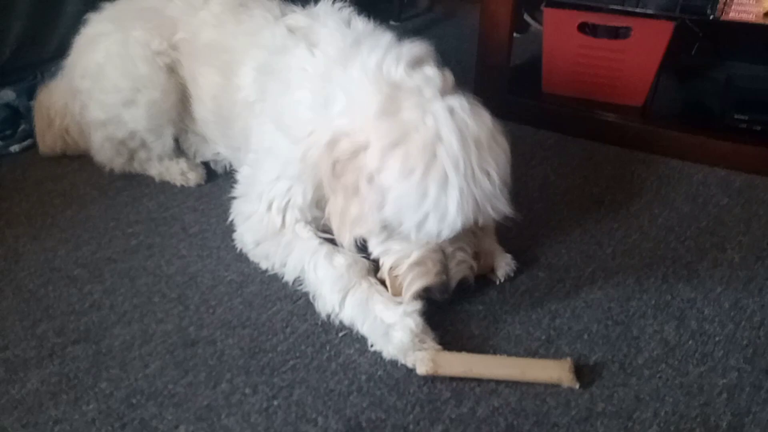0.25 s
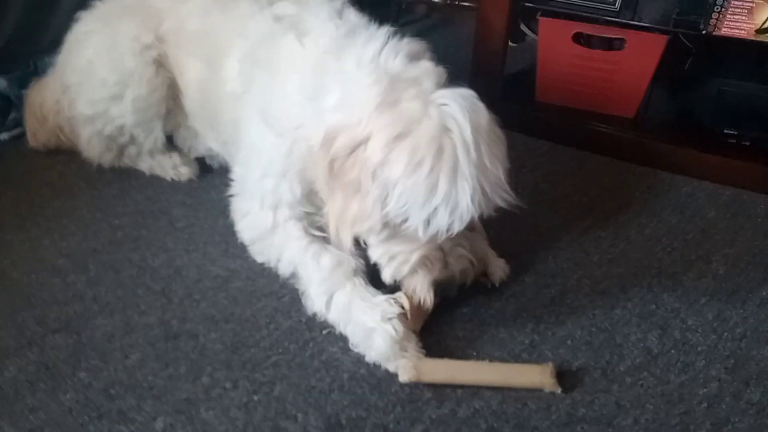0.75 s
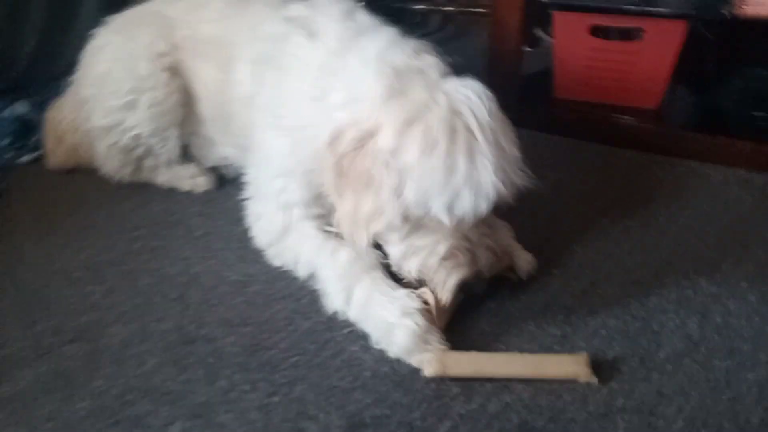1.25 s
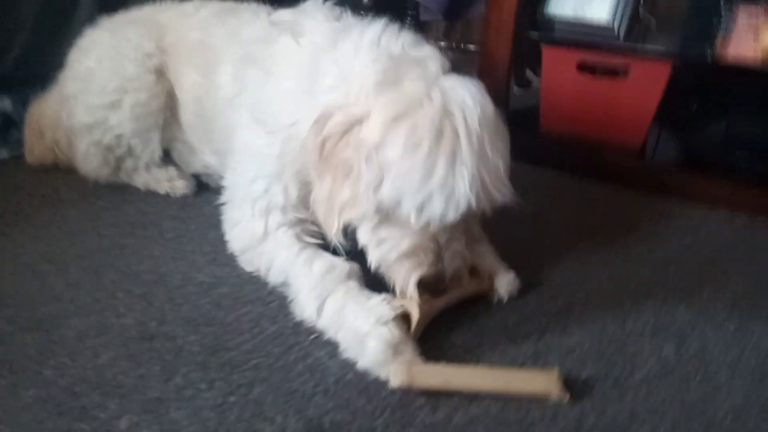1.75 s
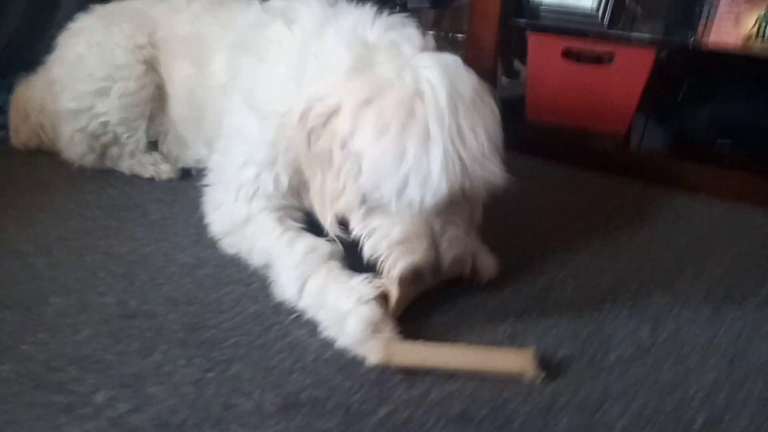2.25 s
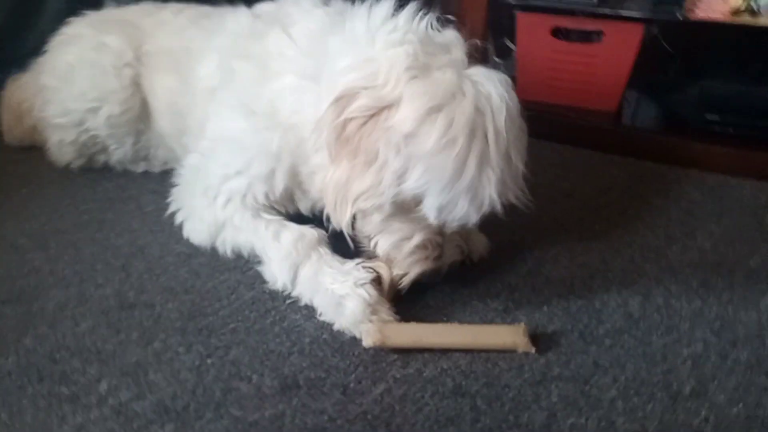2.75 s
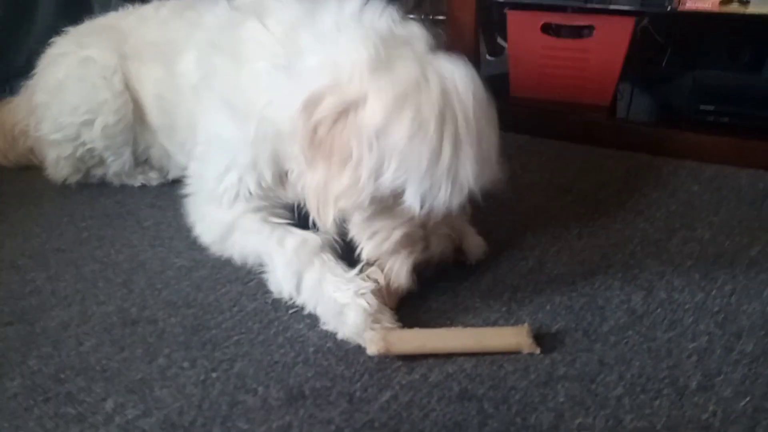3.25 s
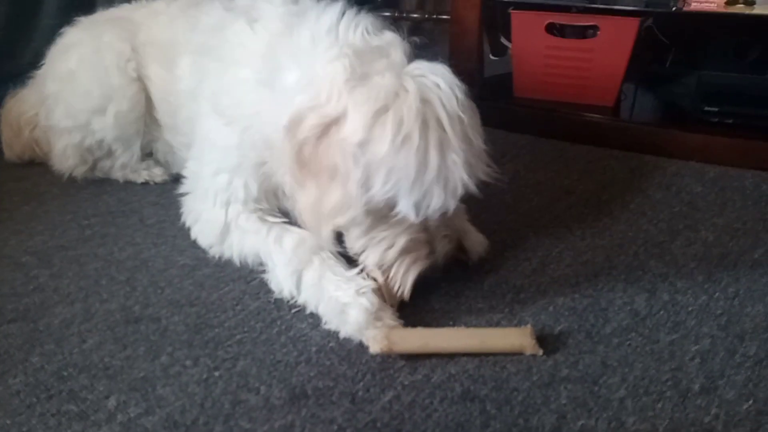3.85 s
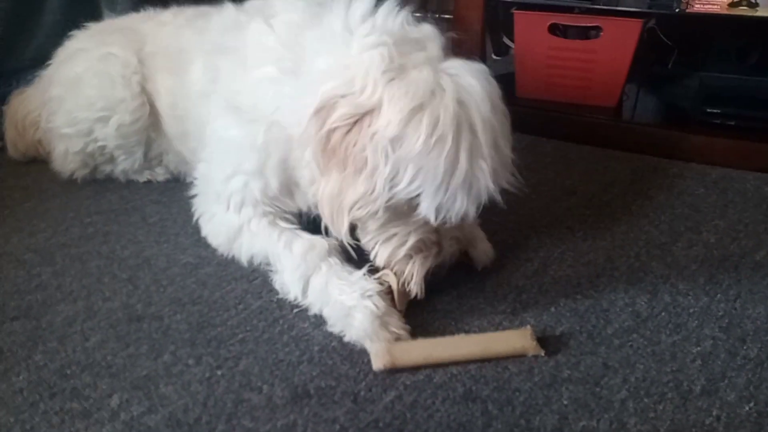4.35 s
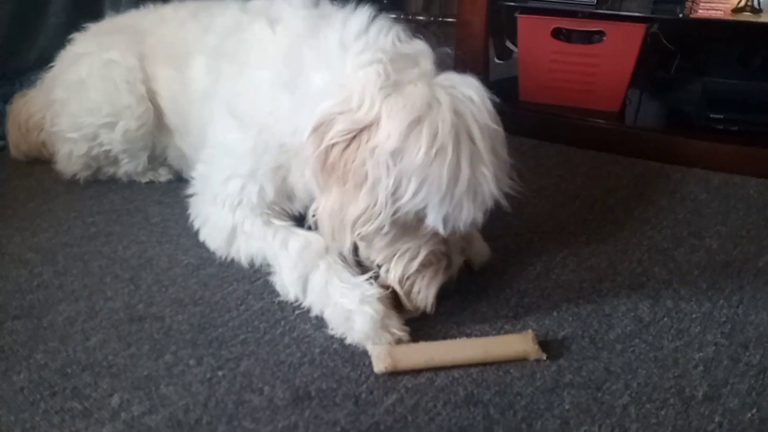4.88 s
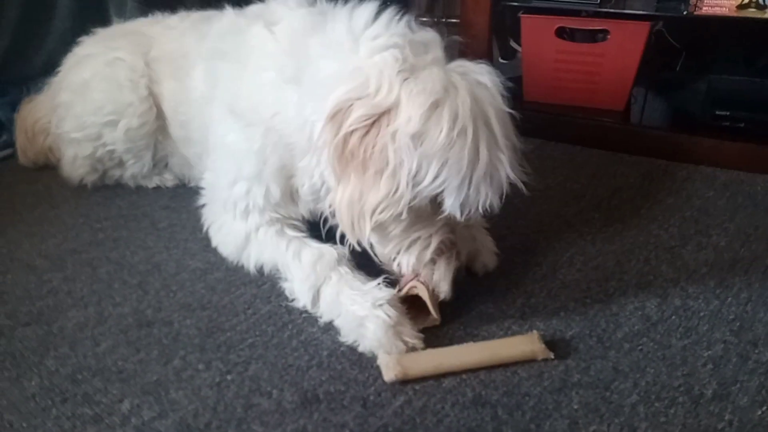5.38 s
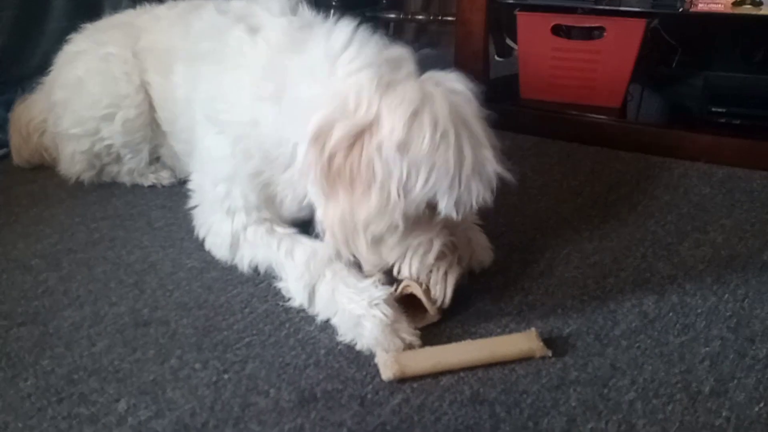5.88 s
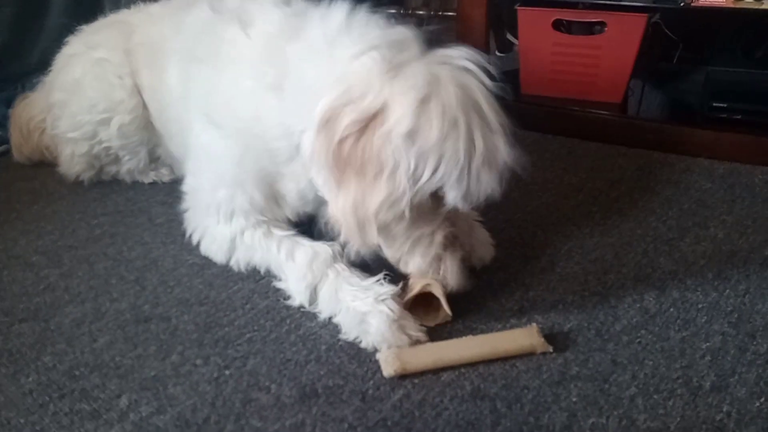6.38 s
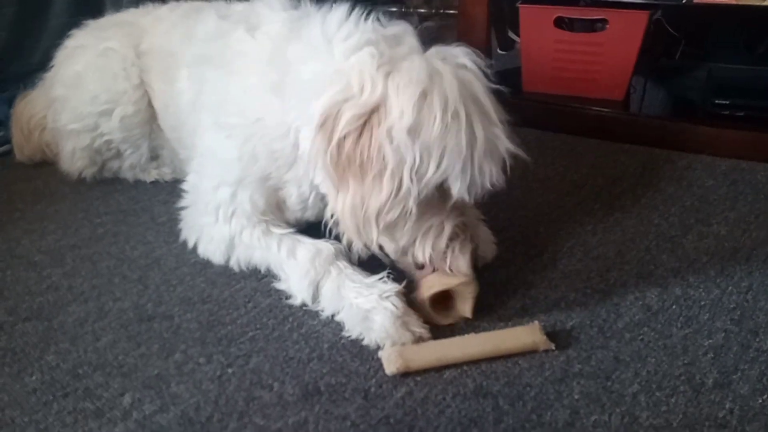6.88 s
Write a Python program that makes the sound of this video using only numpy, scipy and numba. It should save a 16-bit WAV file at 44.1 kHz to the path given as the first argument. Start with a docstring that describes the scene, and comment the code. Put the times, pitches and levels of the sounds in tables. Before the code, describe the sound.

A dog gnaws a hollow bone on carpet, close to a phone microphone in a quiet, damped living room with faint steady hiss. At about 0.3 s teeth scrape very softly, then a cluster of hollow, woody knocks and low floor thumps lands at 0.5-0.7 s. Small dull bumps follow. At 1.3-1.5 s comes a shorter, grating bite with a sharp splinter tick, then a wet smack and a light patchy rustle of fur and tongue fading by 2.2 s. It is nearly quiet until a faint scrape at 2.8 s and a rough crunch at 3.1-3.4 s. The hardest, brightest cracking runs from 3.9 to 4.3 s. A gritty, hollow drag follows at 4.9-5.3 s, and a last strong cluster of knocks and thumps at 5.9-6.4 s, with a tiny moist click. Then only hiss remains to about 7 s.

```python
"""A dog gnaws a hollow bone, close to a phone microphone, on a carpeted floor in a quiet room.
Teeth catch and drag as bursts of random clicks that ring the bone's air column, the jaw and the bone wall.
Shoves make the floor hum low and briefly, with a rough carpet rumble.
Behind that are splinter snaps and wet smacks as noise bursts, a patchy rustle of fur and tongue as dense
crackle, and a faint steady hiss of room tone and microphone noise."""
import sys
import numpy as np
from scipy import signal
from scipy.fft import rfft, irfft
from scipy.io import wavfile
from scipy.ndimage import uniform_filter1d
from numba import njit

SR = 44100
rng = np.random.default_rng(int(sys.argv[2]) if len(sys.argv) > 2 else 0)


def log_audio(samples):
    """Write samples as a 16-bit WAV file to the path given in sys.argv[1]."""
    # one column per channel
    frames = np.atleast_2d(samples).T
    # limit to full scale, then quantise
    limited = np.clip(frames, -1, 1)
    pcm = np.round(limited * 32767).astype(np.int16)
    wavfile.write(sys.argv[1], SR, pcm)


N = 314268
TIME = np.arange(N) / SR

# teeth catching on the bone: start_s, column_db (air column), wall_db (bone wall)
CATCHES = [(0.26, -47.5, -65), (0.383, -55, -69), (.506, -38, -89), (0.543, -37, -72), (.577, -49, -57),
           (.605, -22, -44), (0.642, -23.5, -44), (1.291, -38.5, -71), (1.41, -28.5, -52),
           (2.903, -38.5, -63.5), (3.075, -53, -64), (3.16, -37.5, -75), (3.207, -32.5, -44.5),
           (3.247, -28, -39.5), (3.278, -19, -38), (3.832, -51.5, -75), (3.888, -40, -86.5),
           (3.947, -36.5, -57.5), (3.978, -46.5, -54.5), (4.025, -20.5, -30), (4.048, -28, -49),
           (4.074, -27.5, -27), (4.086, -25.5, -34.5), (4.115, -30.5, -26.5), (4.17, -17, -24.5),
           (4.901, -31.5, -80.5), (4.924, -25, -45), (4.985, -29, -47), (5.152, -21.5, -40),
           (5.187, -40, -43.5), (5.849, -43, -84), (6.08, -16, -41.5), (6.12, -15.5, -26.5),
           (6.178, -35.5, -54), (6.239, -27, -45.5), (6.28, -20.5, -43), (6.309, -18.5, -35.5)]
# teeth dragging along the bone: start_s, length_s, column_db, wall_db
DRAGS = [(0.285, 0.024, -68, -71), (0.388, 0.065, -61, -88), (0.604, 0.1, -55, -61.5),
         (1.333, 0.088, -39.5, -49.5), (1.45, 0.077, -56, -49), (2.829, 0.088, -60.5, -71),
         (3.019, 0.049, -53, -78), (3.136, 0.087, -47.5, -97), (3.201, 0.14, -52, -62),
         (3.951, 0.069, -50, -64.5), (4.029, .19, -43.5, -49), (4.882, 0.23, -48.5, -57),
         (5.139, 0.062, -40.5, -45), (5.933, 0.12, -57, -65.5), (6.089, 0.1, -43, -53.5),
         (6.233, 0.12, -50, -49.5), (6.41, 0.02, -66, -71)]
# how the mouth holds the hollow bone: time_s, column_pitch_hz, wall_ring_db (freedom of the wall to ring)
BONE_HOLD = [(0.499, 702.3, -3.5), (1.403, 635, -4), (2.903, 772, 2), (3.2, 816.4, 2.5),
             (3.301, 604.5, -2.5), (4, 699.5, -1.5), (4.299, 700, -4), (4.9, 712.8, -4),
             (5.13, 715.3, -9.5), (5.189, 839.4, -8.5), (5.798, 700.4, 2), (6.151, 709.8, -6.5),
             (6.251, 700, -6.5), (6.38, 634, -3.5), (6.42, 817, -6)]
# resonances of the bone wall, low to high: centre_hz, width_hz, relative_level_db
WALL_MODES = [(947, 177, 4.5), (1356, 340, -0.5), (1902, 116, 2), (2300, 950, -7.5), (3317, 170, 4.5),
              (3995, 780, -6.5), (5060, 290, -13), (6760, 700, -35), (12530, 11000, -23.5)]
# resonances of the jaw: centre_hz, width_hz, relative_level_db
JAW_MODES = [(175.8, 19, 6), (288.6, 42, -4), (334, 51, -3), (422, 112, -4.5)]
# shoves that set the floor humming: peak_time_s, peak_db, length_ms (scales the rise and fall)
SHOVES = [(0.514, -25, 23.5), (0.572, -27, 61), (0.623, -25.5, 15), (0.659, -28, 61), (0.758, -44.5, 14.5),
          (1.045, -45, 25), (1.076, -36.5, 13.3), (1.166, -52, 60.5), (1.272, -36.5, 13.4),
          (1.31, -44.5, 28.2), (1.349, -35, 22), (1.42, -28, 36), (1.57, -46, 119), (1.717, -44, 25),
          (2.215, -50.5, 21), (2.709, -45, 47.5), (2.874, -33.5, 26.3), (2.936, -26, 51.4),
          (3.081, -43.5, 117), (3.182, -24.5, 45.5), (3.276, -29, 60), (3.342, -37.5, 48), (3.947, -35, 34),
          (3.998, -32, 47), (4.046, -27, 30), (4.093, -26, 16.4), (4.138, -28.5, 33.6), (4.209, -31, 80),
          (4.951, -36, 87), (5.058, -28, 58.4), (5.121, -27, 34), (5.178, -23.5, 19), (5.215, -27.5, 60),
          (5.279, -44.5, 41), (5.885, -36, 51), (5.959, -42, 55), (6.046, -25.5, 29), (6.099, -28, 31.6),
          (6.172, -31, 58), (6.244, -25, 15.6), (6.305, -26.5, 50), (6.367, -37.5, 27), (6.428, -43, 22)]
# splinters and wet smacks: start_s, level_db (before the fade), centre_hz, width_hz, length_ms
SNAPS = [(1.391, -21, 5070, 4470, 0.79), (1.519, -34, 4480, 1720, 4.3), (1.519, -35, 590, 680, 4),
         (1.603, -44.5, 5570, 1400, 24.7), (1.706, -48.5, 3890, 4730, 8.6), (1.706, -51, 1053, 95, 10.3),
         (2.183, -66, 329, 684, 45), (3.537, -62.5, 4700, 2890, 18), (4.93, -45.5, 4050, 820, 2.4),
         (4.927, -52, 7270, 804, 6.7), (6.121, -49.5, 7500, 4001, 15)]
# fur and tongue: time_s, level_db (before the patches), centre_hz
RUSTLE = [(1.33, -84, 4950), (1.39, -64, 5180), (1.44, -85, 5000), (1.471, -58.5, 4770),
          (1.531, -52.5, 5300), (1.59, -69.5, 4950), (1.75, -76.5, 4165), (2.05, -81, 4620),
          (2.21, -73.5, 2290), (2.26, -82, 3070)]
# colour of the room tone and microphone noise: frequency_hz, relative_density_db
HISS_COLOUR = [(30, -24.5), (64, 3.5), (184, -2.5), (311, -9.5), (900, -17), (5000, -27), (16000, -22.5)]
# treble response of the phone microphone: frequency_hz, gain_db
MIC_RESPONSE = [(6300, 1.5), (8000, -13), (11000, -14), (13500, -12.5), (15300, -3)]

CATCH_MS, GENTLE_MS_PER_DB = 7.42, 0.1039  # a catch that barely stirs the wall lasts longer
DRAG_ATTACK_S, DRAG_RELEASE_S = 0.024, 0.022  # time constants
JUDDER_HZ, JUDDER_DB = 29.8, 3  # centre rate and rms depth of the uneven grip and slip
# the floor hums higher under a brief or hard shove, and while the jaws clamp the bone wall
FLOOR_HZ, BRIEF_HZ_MS, HARD_HZ_PER_DB = 118.3, 221.1, 0.5448
CLAMP_DB, CLAMP_HZ_PER_DB = -62, 0.75
HISS_DB = -68  # rms ahead of the microphone
TOP_HZ = 15900  # upper cutoff of the microphone


def gnaw():
    """Catches and drags press grit on the bone, ringing its air column, the jaw and the bone wall."""
    force = catches() + drags()
    column_force, jaw_force, low_wall_force, high_wall_force = force
    grit = unit(grains(2500, 1.96))
    splinters = unit(grains(1200, 2.3))
    s, hz, db = np.transpose(BONE_HOLD)
    column_hz = np.interp(TIME, s, hz)
    wall_ring = undb(np.interp(TIME, s, db))

    # the slipping partly locks to the air column, whose pitch wavers with the tongue
    waver = 1 + 0.079 * unit(band(band(rng.standard_normal(N), 15, 30), 17.5, 40))
    lock = undb(-27.5) * column_force ** 0.73 * tone(column_hz * waver)  # gentle scrapes lock best
    column = undb(15) * band(band(column_force * grit + lock, column_hz, 100), column_hz, 500)

    jaw = undb(23.5) * band(body(jaw_force * grit, JAW_MODES), 300, 700)
    low_wall = body(low_wall_force * grit, WALL_MODES[:4])
    low_wall = undb(13) * band(band(low_wall, 970, 2670), 1100, 3800)

    # wet fur and lips add a soft wash that outlasts each scrape
    pressure = np.abs(uniform_filter1d(jaw_force, size=4000)) ** 0.47
    wash = undb(-47.5) * pressure * band(rng.standard_normal(N), 5000, 14000)

    high_wall = body(wall_ring * high_wall_force * splinters, WALL_MODES[4:7])
    high_wall = undb(18) * band(high_wall, 3500, 2600)
    # hard cracks favour the top modes
    top_wall = undb(29.5) * body(high_wall_force ** 1.23 * splinters, WALL_MODES[7:])
    return column + jaw - low_wall + wash + high_wall + top_wall


def catches():
    """Each catch presses quickly and lets go; the force on the upper wall rises fastest."""
    force = np.zeros((4, N))
    t = TIME[:SR // 5]
    for s, column_db, wall_db in CATCHES:
        ms = CATCH_MS - GENTLE_MS_PER_DB * wall_db
        slow = (1 - np.exp(-t / 0.0048)) * np.exp(-(1000 * t / ms) ** 0.99)
        crack = (1 - np.exp(-t / 0.00032)) * np.exp(-(1000 * t / (0.91 * CATCH_MS)) ** 0.81)
        start = int(s * SR)
        shape = np.array([slow, slow, slow, crack])
        force[:, start:start + len(t)] += contact(column_db, wall_db) * shape
    return force


def drags():
    """Each drag holds its force for a while, but grips and slips unevenly."""
    force = np.zeros((4, N))
    judder = undb(JUDDER_DB * unit(band(rng.standard_normal(N), JUDDER_HZ, 2 * JUDDER_HZ)))
    for s, length, column_db, wall_db in DRAGS:
        near = slice(int(s * SR), int((s + .5) * SR))
        t = np.maximum(TIME[near] - s, 0)
        press = 1 - np.exp(-t / DRAG_ATTACK_S)
        release = np.exp(-np.maximum(t - length, 0) / DRAG_RELEASE_S)
        force[:, near] += contact(column_db, wall_db) * press * release * judder[near]
    return force


def contact(column_db, wall_db):
    """Force on column, jaw, lower and upper wall: the jaw shakes midway, hard bites brighten the wall."""
    jaw_db = 0.54 * column_db + 0.46 * wall_db
    low_wall_db = 0.38 * column_db + 0.76 * wall_db
    return undb([column_db, jaw_db, low_wall_db, 1.279 * wall_db])[:, None]


def floor_hum():
    """One floor resonance swells with each shove and takes its pitch; the carpet adds a rough rumble."""
    # tiny floors keep the pitch defined (100 Hz) between shoves
    total_power, weighted_hz = np.full(N, 1e-9), np.full(N, 1e-7)
    bite_s, _, wall_db = np.transpose(CATCHES)
    for s, db, ms in SHOVES:
        clamp_db = max(np.interp(s, bite_s, wall_db) - CLAMP_DB, 0)
        hz = FLOOR_HZ + BRIEF_HZ_MS / ms + HARD_HZ_PER_DB * db + CLAMP_HZ_PER_DB * clamp_db
        near = slice(int((s - .2) * SR), int((s + .3) * SR))
        t = TIME[near] - s
        width_ms = ms * np.where(t < 0, .5, .7)  # rises faster than it falls
        power = (undb(db) * np.exp(-(1000 * t / width_ms) ** 2)) ** 2
        total_power[near] += power
        weighted_hz[near] += power * hz
    rumble = unit(band(band(band(rng.standard_normal(N), 64, 92), 110, 140), 110, 140))
    return np.sqrt(total_power) * (tone(weighted_hz / total_power) + undb(-10) * rumble)


def snaps():
    """Splinters and wet smacks: noise bursts with a sudden start, each in its own band."""
    out = np.zeros(N)
    t = TIME[:SR // 10]
    noises = rng.standard_normal((len(SNAPS), len(t)))
    for (s, db, hz, width, ms), noise in zip(SNAPS, noises):
        burst = unit(band(band(noise, hz, width), hz, 2 * width))
        start = int(s * SR)
        out[start:start + len(t)] += undb(db) * burst * np.exp(-(1000 * t / ms) ** 4)
    return out


def rustle():
    """Fur and tongue: fine dense crackle in a broad band that drifts, in patches."""
    s, db, hz = np.transpose(RUSTLE)
    centre_hz = np.interp(TIME, s, hz)
    crackle = unit(band(band(grains(12000, 0.69), centre_hz, 2450), centre_hz, 5100))
    patches_db = 2.8 * unit(band(rng.standard_normal(N), 24, 28))
    return crackle * undb(np.interp(TIME, s, db, -200, -200) + patches_db)


def hiss():
    """Steady room tone and microphone noise, as coloured random noise."""
    return undb(HISS_DB) * unit(shaped(rng.standard_normal(N), HISS_COLOUR))


def room_tail(x, t60, wet_db):
    """A short, damped living room: decaying noise that falls 60 dB in t60 seconds, after a 3 ms gap."""
    t = TIME[:SR // 4]
    tail = rng.standard_normal(len(t)) * np.exp(-np.log(1000) * t / t60) * (t > .003)
    return x + undb(wet_db) * signal.fftconvolve(x, tail / np.linalg.norm(tail))[:N]


def undb(db):
    """Decibels to amplitude."""
    return 10 ** (np.asarray(db) / 20)


def unit(x):
    """Scale to an rms of 1."""
    return x / np.sqrt(np.mean(x ** 2))


@njit
def svf(x, hz, width):
    """State-variable band-pass with a moving centre, gain 1 at the centre."""
    y, b, l = np.empty(len(x)), 0., 0.
    for i in range(len(x)):
        g, k = np.tan(np.pi * hz[i] / SR), width / hz[i]
        v = (b + g * (x[i] - l)) / (1 + g * (g + k))
        b, l, y[i] = 2 * v - b, l + 2 * g * v, k * v
    return y


def band(x, hz, width):
    """One resonance; hz may be fixed or a curve. The tiny offset avoids slow denormal numbers."""
    return svf(x + 1e-18, hz + np.zeros(len(x)), float(width))


def body(x, modes):
    """Sum of resonances with alternating sign."""
    return sum((-1) ** k * undb(db) * band(x, hz, width) for k, (hz, width, db) in enumerate(modes))


def grains(per_s, scatter_db):
    """Random stick-slip clicks of either sign: most small, a few large."""
    chance, side, size = rng.random((3, N))
    clicks = (chance < per_s / SR) * np.sign(side - .5)
    return clicks * undb(-scatter_db * np.log(1 - size))


def tone(hz):
    """Sine that follows a pitch curve from a random start."""
    return np.sin(2 * np.pi * (np.cumsum(hz) / SR + rng.random()))


def shaped(x, points):
    """Colour by (Hz, dB) points joined on a log axis."""
    hz, db = np.transpose(points)
    bins = np.maximum(np.fft.rfftfreq(N, 1 / SR), 1)
    return irfft(rfft(x) * undb(np.interp(np.log(bins), np.log(hz), db)), N)


def scene():
    """The gnawing, snaps and rustle ring the room; the floor hum and hiss stay dry."""
    near = room_tail(gnaw(), 0.1, -8.5) + room_tail(snaps() + rustle(), 0.11, -12.5)
    return (near + floor_hum() + hiss())[None]


def record(dry):
    """The phone is weak above the presence range, recovers near the top, thins deep bass and cuts the top."""
    bass_cut = signal.butter(2, 45, "high", fs=SR, output="sos")
    top_cut = signal.ellip(8, .2, 70, TOP_HZ, fs=SR, output="sos")
    thin = signal.sosfilt(bass_cut, shaped(dry, MIC_RESPONSE))
    return signal.sosfilt(top_cut, thin)


dry = scene()
out = record(dry)
log_audio(out)
```